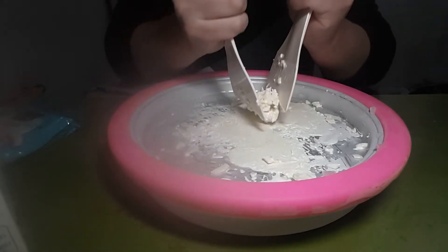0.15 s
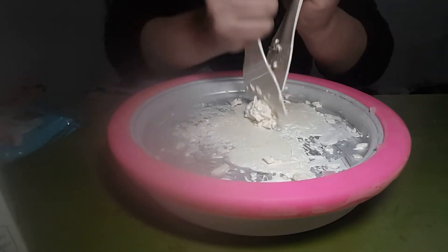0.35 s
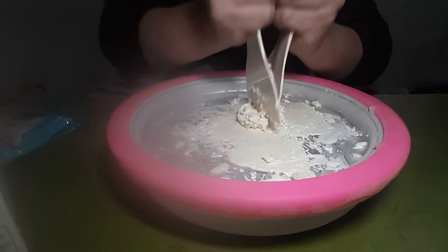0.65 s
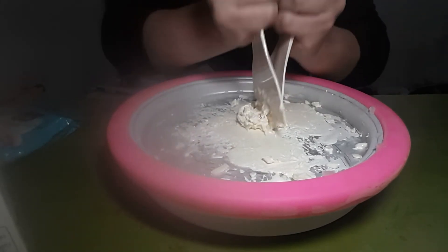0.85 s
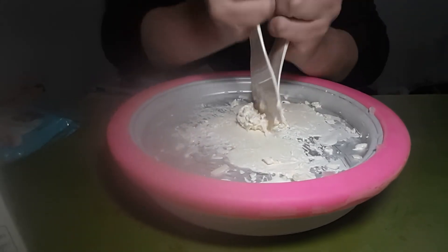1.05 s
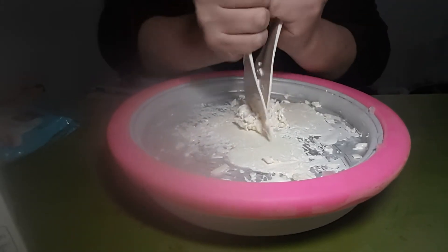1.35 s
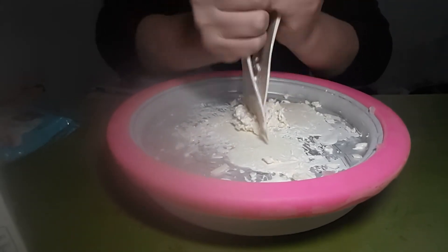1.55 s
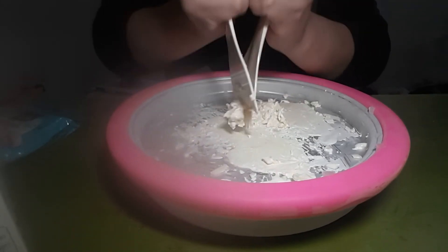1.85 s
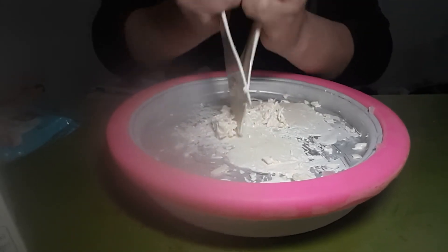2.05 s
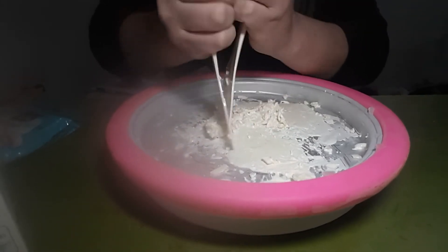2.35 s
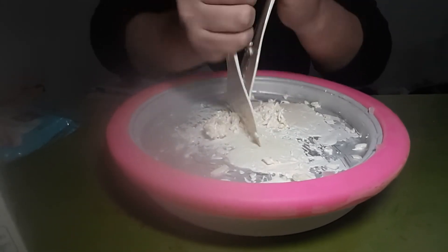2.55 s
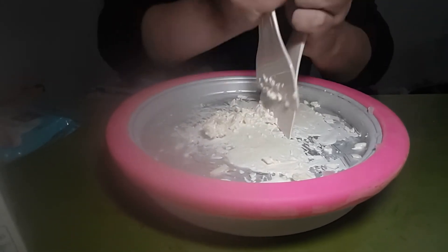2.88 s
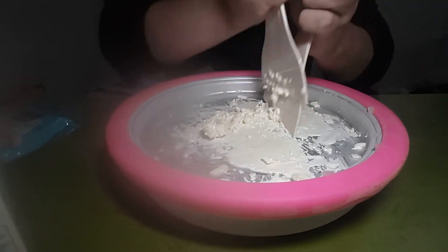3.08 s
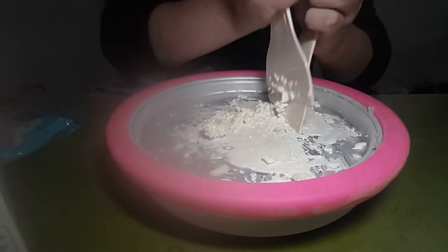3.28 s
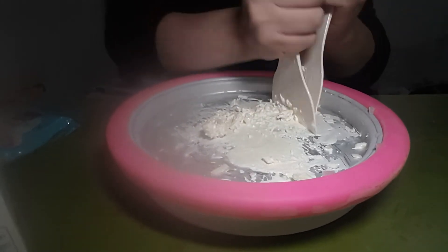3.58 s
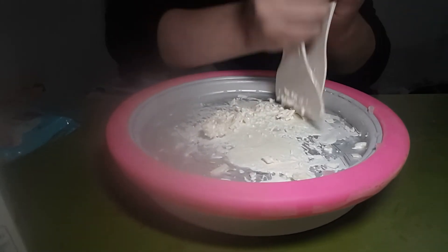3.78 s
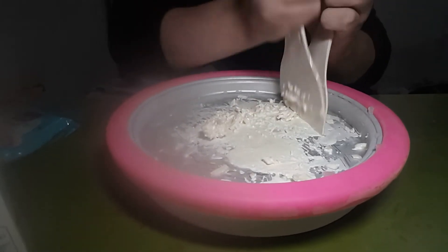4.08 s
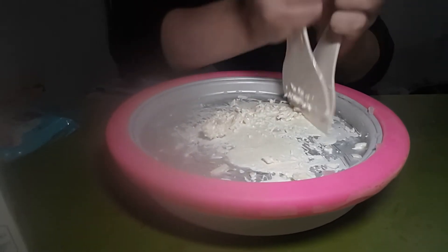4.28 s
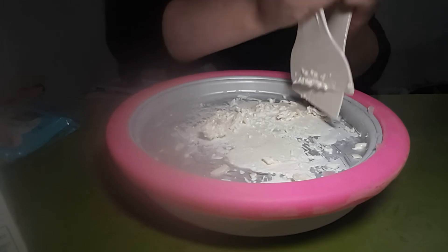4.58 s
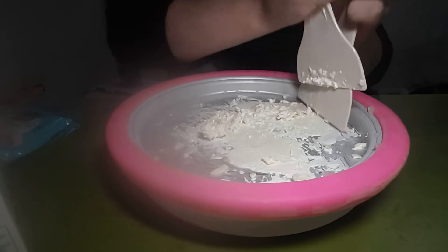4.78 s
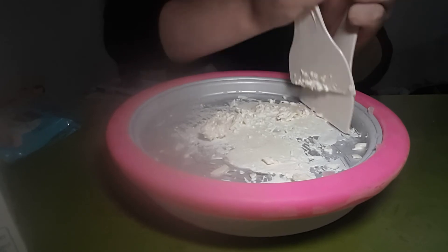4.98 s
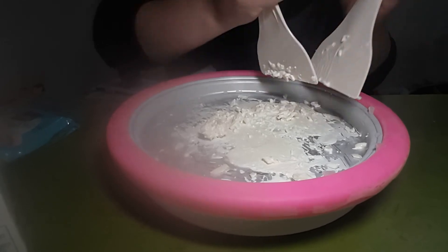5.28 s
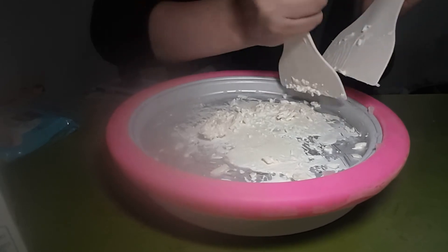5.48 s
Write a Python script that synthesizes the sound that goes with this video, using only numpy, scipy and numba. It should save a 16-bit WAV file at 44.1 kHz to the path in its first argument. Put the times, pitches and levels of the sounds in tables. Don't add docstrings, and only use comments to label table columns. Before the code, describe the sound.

Two plastic spatulas chop rapidly and unevenly at a crumbly frozen heap on a cold metal plate, with crunchy scrapes, icy fizz and hollow table thumps.

```python
import sys
import numpy as np
from scipy import signal
from scipy.fft import rfft, irfft
from scipy.io import wavfile
from scipy.ndimage import uniform_filter1d
from numba import njit

SR = 44100
rng = np.random.default_rng(int(sys.argv[2]) if len(sys.argv) > 2 else 0)


def invert_db(level):
    return 10 ** (np.asarray(level, dtype=float) / 20)


def dump(signal):
    limited = np.clip(np.atleast_2d(signal).T, -1, 1)
    pcm = np.round(limited * 32767).astype(np.int16)
    wavfile.write(sys.argv[1], SR, pcm)


N = 248283

NOTES_HZ = [
    1603,
    970,
    1235,
]
# (start [s], end [s])
RIM_S = (3.45, 5.1)
LEFT_DB = -2.5
BALANCE = invert_db(np.array([[LEFT_DB], [-LEFT_DB]]) / 2)


def band(x, lo_hz, hi_hz, order=2):
    return signal.sosfilt(signal.butter(order, [lo_hz, min(hi_hz, .45 * SR)], "band", fs=SR, output="sos"), x)


def blows(s, size):
    return np.bincount((np.asarray(s) * SR).astype(int), size, N)[:N]


def settle(power, t60):
    return signal.lfilter([1], [1, -np.exp(-2 * np.log(1000) / (t60 * SR))], power)


def ring(x, modes):
    out = 0
    for hz, swing, t60 in modes:
        pole = np.exp(2j * np.pi * hz / SR - np.log(1000) / (t60 * SR))
        out = out + swing * signal.lfilter([1], [1, -pole], x, axis=-1).imag
    return out


def struck(events, modes):
    s, db = np.transpose(events)
    return ring(blows(s, invert_db(db)), modes)


def walk(rate):
    k = int(SR / rate)
    steps = np.repeat(rng.standard_normal(N // k + 1), k)
    return 0.88 * uniform_filter1d(uniform_filter1d(steps, k), k)[:N]


def lay(s, grains, db):
    at = (s * SR).astype(int)[:, None] + np.arange(grains.shape[1])
    return np.bincount(at.ravel(), (grains * invert_db(db)[:, None]).ravel(), N)[:N]


def grit(count, length, rough_db):
    jumps = rng.standard_normal((count, length // 64 + 1))
    return invert_db(rough_db * np.repeat(jumps, 64, axis=1)[:, :length])


def ports(count, length, alike, lag):
    chance = rng.standard_normal((count, 3, length))
    own = np.sqrt(1 - alike ** 2)
    grains = [alike * chance[:, 0] + own * chance[:, k] for k in (1, 2)]
    return grains, [0, lag * chance[:, 2, -1] / SR]


def chops():
    # (time [s], crack [dB], plate [dB], table [dB], ice [dB])
    short_chops = [(.534, -37, -15, -14, -40), (.7665, -39, -14, -12.5, -52),
                   (1.146, -37, -16.5, -11.5, -49), (1.254, -11, -7, -4.5, -43),
                   (1.4434, -34.5, -25, -22, -55), (1.492, -20.5, -10, -9.5, -63),
                   (1.6442, -16.5, -6, -5, -41), (1.8291, -14.5, -3.5, -21, -49),
                   (2.998, -27.5, -14, -19, -53), (3.317, -37.5, -19.5, -13.5, -45),
                   (3.5532, -31.5, -13.5, -1.7, -55), (3.7805, -20, -13.5, -8, -62),
                   (3.9223, -15.5, -9, 1.5, -25.5), (4.1439, -16, -11.5, -5, -65),
                   (4.3262, -24, -22, -9, -58)]
    long_chops = [(0.4787, -31, -16, -19, -52), (0.6646, -28, -5.5, -17, -29.5),
                  (0.7071, -27, -16.5, -8.5, -32), (0.8723, -39, -16, -18, -53),
                  (0.904, -37.5, -35, -16, -44), (1.087, -30, -24, -32, -38.5),
                  (1.873, -30, -24, -9, -35.5), (1.892, -22, -16, -12.5, -60), (2.03, -33, -6.5, -16, -55),
                  (2.071, -32, -23, -9, -55), (2.1041, -28, -13.5, -14, -58),
                  (2.2985, -24.5, -14, -11.5, -51), (2.4309, -22, -3, -10, -38),
                  (2.7, -26.5, -15.5, -6.5, -46), (2.777, -24, -22.5, -11.5, -70),
                  (3.0932, -23, -14.5, -4.5, -60), (3.51, -29, -11.5, -11, -37),
                  (3.7048, -15, -7.5, 3.5, -52), (3.997, -21.5, -10, -2.5, -55),
                  (4.4023, -18.5, -12.5, -6, -53), (4.5374, -10, -3.5, 1.4, -42),
                  (4.6137, -18, -11, -7.5, -38), (4.8496, -17.5, -9.5, -9.5, -10.5),
                  (5.2062, -20.5, -5, -20, -27.5)]
    # (time [s], crack [dB], plate [dB], table [dB], ice [dB])
    twin_chops = [(.963, -38, -19.5, -14, -42), (1.05, -30, -12.5, -10, -45),
                  (1.2015, -41, -26.5, -24, -60), (2.235, -14, 0.4, -18, -34),
                  (2.655, -26.5, -6, -17, -44.5), (2.92, -27.5, -16.5, -14.5, -59),
                  (3.196, -35.5, -26, -11.5, -46.5), (3.369, -33, -20.5, -17, -47),
                  (3.562, -24.5, -33, -12, -54), (4.19, -17.5, -10, -4.5, -22.5),
                  (4.769, -12.5, -12.5, -3.5, -15.5), (4.975, -21.5, -18.5, -10.1, -34.5),
                  (5.029, -40, -26.5, -12, -41)]
    groups = zip((short_chops, long_chops, twin_chops), NOTES_HZ)
    return np.vstack([np.insert(np.array(rows), 5, hz, axis=1) for rows, hz in groups]).T


def contacts():
    # (time [s], crack [dB], ice [dB])
    scuffs = [(0.4603, -44, -31), (0.692, -35, -51), (1.032, -38, -44), (1.126, -36, -41.5),
              (1.807, -47, -47), (2.689, -37, -41), (2.971, -32.5, -37), (3.166, -35, -43),
              (3.482, -54, -57), (3.895, -43, -42), (3.98, -29, -24.5), (4.1145, -46, -40),
              (4.298, -56, -29.5), (4.38, -27.5, -45), (4.396, -35, -25.5), (4.513, -42, -42.5),
              (4.605, -38, -31), (4.831, -29, -26.5), (5.04, -34, -58), (5.182, -36.5, -49)]
    s, crack_db, _, _, ice_db, hz = chops()
    scuffs = np.insert(np.array(scuffs), 3, NOTES_HZ[1], axis=1).T
    return np.hstack([[s, crack_db, ice_db, hz], scuffs])


def at_rim(s):
    return (s > RIM_S[0]) & (s < RIM_S[1])


def blades():
    # (frequency [Hz], signed swing, time to fall 60 dB [s])
    blade_modes = [
        (930, 0.14, 0.02),
        (1300, 0.48, 0.0061),
        (1700, 0.65, 0.0068),
        (2530, 0.024, 0.066),
        (3810, 0.21, 0.0081),
        (4570, 0.089, 0.011),
    ]
    crack_s, note_t60_s = 0.0025, 0.033
    note_db, left_db = -6.0, -4.0
    s, db, ice_db, hz = contacts()
    s = s + .0002
    hz = hz * (1 + .012 * rng.standard_normal(len(s)))
    t = np.arange(5000) / SR
    rim = at_rim(s)
    crunch_db = ice_db + 2
    crunch_db = np.where(rim, np.maximum(crunch_db, db - 30.5), crunch_db)
    sung_db = db - 6.5 * rim
    crumble = grit(len(s), len(t), rough_db=4.0)
    splinter = np.exp(-t / crack_s) + invert_db(-15.5) * crumble * np.exp(-t / 0.023)
    crush = np.exp(-t / 0.0004) + invert_db(-22.5) * crumble * np.exp(-t / 0.0096)
    note = invert_db(note_db) * np.sin(2 * np.pi * hz[:, None] * t) * invert_db(-60 * t / note_t60_s)
    out = []
    for grain, late, sign in zip(*ports(len(s), len(t), alike=.72, lag=1.7), (1, -1)):
        body = lay(s + late, grain * splinter, db)
        crunch = band(lay(s + late, grain * crush, crunch_db + 9.0), 2600, 6300, order=3)
        sound = invert_db(-18.5) * ring(body, blade_modes) + band(body, 670, 2810, order=3)
        sound = sound + lay(s + late, note, sung_db)
        out.append((sound + crunch) * invert_db(sign * left_db / 2))
    return np.array(out)


def crystals():
    # (time [s], fizz [dB], top
    # octave above fizz [dB])
    shards = [(.5097, -31.5, -18), (0.5242, -28.5, -20), (.6244, -47, -17), (.7467, -24, -45),
              (0.8963, -37, -6), (.931, -33.5, -14), (1.215, -43.5, -6), (1.232, -35, -21),
              (1.285, -34.5, -3), (1.701, -33, -13), (1.7923, -56, -1.5), (2.0026, -36, -12),
              (2.0266, -34, -22), (2.0898, -31, -5), (2.1909, -56, -2), (2.2871, -39, -8), (2.4, -40, -16),
              (2.4662, -27.5, -23), (2.488, -28, -20), (2.8554, -40, -18), (3.035, -36, -25),
              (3.0698, -36, -16), (3.137, -33, -14), (3.259, -39, -13), (3.3533, -34, -14),
              (3.5393, -28.5, -18), (3.716, -25, -18), (3.7668, -31.5, -13), (3.871, -40.5, -14.5),
              (5.084, -40.5, -9)]
    rise_s, fall_s = 0.0019, 0.0018
    at, _, ice_db, _ = contacts()
    fizz_db = ice_db - 0.26 * (ice_db + 31)
    dull_db = -16.5 - 0.11 * (ice_db + 52)
    s, db, top_db = np.hstack([np.transpose(shards), [at - .0007, fizz_db, dull_db]])
    t = np.arange(2600) / SR
    swell = (1 - np.exp(-t / rise_s)) * (np.exp(-t / fall_s) + invert_db(-23.0) * np.exp(-t / 0.024))
    swell = swell * grit(len(s), len(t), rough_db=3.0)
    grains, late = ports(len(s), len(t), alike=0.7, lag=2.5)
    fizz = np.array([lay(s + d, g * swell, db + 1.0) for g, d in zip(grains, late)])
    top = np.array([lay(s + d, g * swell, db + top_db + 12) for g, d in zip(grains, late)])
    return band(fizz, 2500, 11800, order=3) + band(top, 10700, 22000, order=3)


def drag():
    # (time [s], hiss [dB])
    plunges = [(.469, -62), (.64, -61.5), (.85, -61), (1.02, -61), (1.335, -61.5), (1.423, -62.5),
               (1.613, -60), (1.81, -59.5), (2.01, -60.5), (2.2, -60), (2.41, -64), (2.62, -68.5),
               (2.871, -62), (3.069, -64), (3.274, -57.5), (3.486, -62.5), (3.69, -58), (3.881, -62),
               (4.109, -58), (4.28, -62), (4.51, -64), (4.745, -67), (5.17, -73)]
    grind_db, hiss_db = -52, -62
    rise_s, plunge_s = 0.01, .02
    s, crack_db = chops()[:2]
    push_db = 0.28 * (crack_db + 19.5)
    push = uniform_filter1d(blows(s + rise_s / 2, invert_db(2 * push_db)), int(rise_s * SR))
    t = np.arange(N) / SR
    swell = sum(invert_db(2 * db) * np.exp(-((t - at) / plunge_s) ** 2) for at, db in plunges)
    grind = invert_db(2 * grind_db) * settle(push, 0.28) + invert_db(2 * 2.5) * swell
    grind = grind + invert_db(2 * -69) * np.exp(-((t - 0.39) / 0.2) ** 2)
    hiss = invert_db(2 * hiss_db) * settle(push, 0.26) + swell
    return np.sqrt(np.abs([grind, hiss]))


def crumbs():
    rate = 1500
    grind_gain, hiss_gain = drag()
    snap = (rng.random((3, N)) < rate / SR) * rng.standard_normal((3, N))
    snap = snap * invert_db(2.4 * rng.exponential(size=(3, N)))
    snap = snap[0] + 2.2 * snap[1:]
    grind, hiss = band(snap, 1500, 6300), band(snap, 6000, 16000)
    grind = grind / grind.std() * grind_gain * invert_db(4.5 * walk(90))
    return grind + hiss / hiss.std() * hiss_gain * invert_db(2.5 + 5.3 * walk(140))


def knocks():
    # (time after the blow [s], level [dB])
    bounces = [
        (.0052, -12.5),
        (.0098, -23),
    ]
    s, _, db = chops()[:3]
    rim = at_rim(s)
    (late, late_db), (later, later_db) = bounces
    down = list(zip(s[~rim], db[~rim])) + list(zip(s[rim] + late, db[rim] + late_db))
    up = list(zip(s[rim], db[rim])) + list(zip(s[rim] + later, db[rim] + later_db))
    return down, up


def plate(down, up):
    # (frequency [Hz], signed swing, time to fall 60 dB [s])
    modes = [
        (427, .23, .064),
        (519, -.425, .033),
        (717, -.17, .013),
        (295, .05, .03),
    ]
    return struck(down, modes) - struck(up, modes)


def thumps():
    # (time [s], strength [dB])
    rocks = [(0.6805, -11.5), (1.0748, -6.5), (1.2671, -11.5), (1.2869, -10.5), (1.4588, -14.5),
             (1.473, -21), (1.6366, -23), (1.658, -18), (1.8485, -14.5), (1.9153, -16.5), (2.2631, -8.5),
             (2.4444, -15.5), (2.4562, -10), (2.6759, -13), (2.7103, -38), (3.1067, -17), (3.357, -18.5),
             (3.5266, -13.5), (4.0126, -15), (4.155, -25), (4.337, -10), (5.1943, -14.5), (5.215, -19.5)]
    s, _, _, table_db = chops()[:4]
    return list(zip(s - 0.00095, table_db)) + rocks


def table(pushes):
    # (frequency [Hz], signed swing, time to fall 60 dB [s])
    modes = [
        (84.8, 0.18, 0.18),
        (106.3, -0.36, 0.1),
        (137.3, 0.15, 0.15),
        (225, -0.039, 0.084),
    ]
    return struck(pushes, modes)


def rattle(events, lo_hz, hi_hz, t60, db, apart):
    s, blow_db = np.transpose(events)
    fade = settle(blows(s, invert_db(2 * blow_db)), t60)
    noise = rng.standard_normal((3, N))
    noise = band(noise[0] + apart * noise[1:], lo_hz, hi_hz)
    soft_start = np.sqrt(uniform_filter1d(fade, 300, origin=149))
    return noise / noise.std() * soft_start * invert_db(db + 2.0 * walk(30))


@njit
def walls(x, lags, gain, damp):
    line, soft, out = np.zeros((8, 4096)), np.zeros(8), np.zeros((2, len(x)))
    for i in range(len(x)):
        total = 0.
        for k in range(8):
            soft[k] += (1 - damp) * (gain[k] * line[k, (i - lags[k]) & 4095] - soft[k])
            total += soft[k]
            out[k % 2, i] += soft[k]
        for k in range(8):
            line[k, i & 4095] = x[i] + soft[k] - total / 4
    return out


def room(heard):
    t60_s, damp, room_db = 0.22, 0.25, -10.5
    lags = rng.integers(300, 2200, 8)
    return invert_db(room_db) * walls(heard, lags, invert_db(-60 * lags / SR / t60_s), damp)


def air():
    # (frequency [Hz], level [dB per Hz])
    loudness = [(47, -17), (80, -4), (91, -30), (159, -6.5), (199, -18.5), (237, -16), (461, -18.5),
                (672, -27.5), (768, -18), (820, -20.5), (958, -18.5), (1070, -25.5), (2600, -35),
                (7200, -50), (16000, -43)]
    # (frequency [Hz], likeness [0-1])
    likeness = [
        (60, 0.7),
        (130, 0.95),
        (290, 0.88),
        (640, 0.55),
        (1410, 0),
        (3100, 0.0),
        (6820, 0.02),
        (15000, 0),
    ]
    hz = np.maximum(np.fft.rfftfreq(N, 1 / SR), 1)

    def read(rows):
        points_hz, values = np.transpose(rows)
        return np.interp(np.log(hz), np.log(points_hz), values)

    alike = np.clip(read(likeness), 0, 1)
    mid, side = rfft(rng.standard_normal((2, N))) * invert_db(read(loudness))
    side = side * np.sqrt(1 - alike) * np.array([[1], [-1]])
    hush = irfft(mid * np.sqrt(1 + alike) + side, N)
    return hush / hush.mean(axis=0).std() * invert_db(-52.5 + 0.44 * walk(3.6))


def compressor():
    # (frequency [Hz], level [dB])
    lines = [
        (59.2, -48),
        (150.7, -67),
        (780.6, -73),
    ]
    t = np.arange(N) / SR
    drone = 0
    for hz, db in lines:
        level = np.sqrt(2) * invert_db(db + .9 * walk(4.6))
        wander_s = .008 * np.cumsum(walk(24.93)) / SR
        drone = drone + level * np.sin(2 * np.pi * hz * (t + wander_s))
    return drone * BALANCE


def scene():
    down, up = knocks()
    pushes = thumps()
    metal = plate(down, up)
    dish = rattle(pushes, 173, 479, 0.2, -26.5, 0.43)
    dish = dish + rattle(pushes, 40.5, 172, 0.44, -29.5, 0.3)
    dish = dish + rattle(down + up, 140, 657, 0.37, -31, 1.0)
    edge = blades() + crystals() + crumbs()
    heard = edge.mean(axis=0) + .3 * metal + 1e-18
    near = (metal + table(pushes) + dish) * BALANCE + edge
    return near + room(heard) + air() + compressor()


def low_pass(x):
    return signal.sosfilt(signal.butter(12, 16970, fs=SR, output="sos"), x)


def record(dry):
    top = signal.ellip(8, .2, 50, 15750, fs=SR, output="sos")
    return low_pass(signal.sosfilt(top, dry))


dry = scene()
out = record(dry)
dump(out)
```